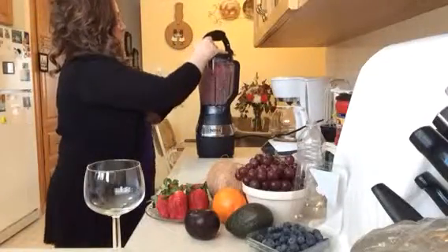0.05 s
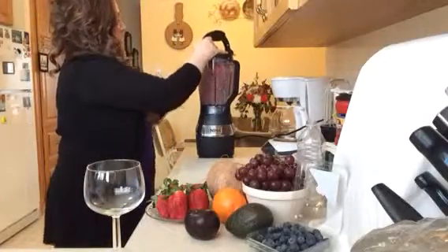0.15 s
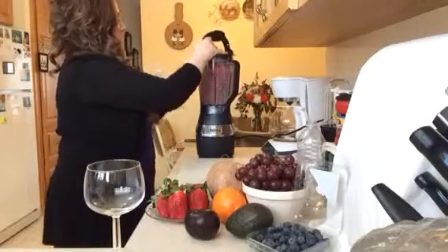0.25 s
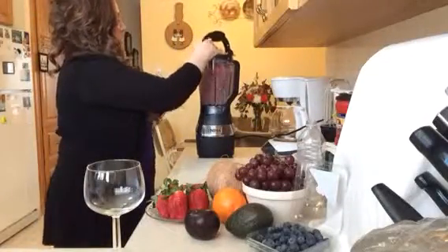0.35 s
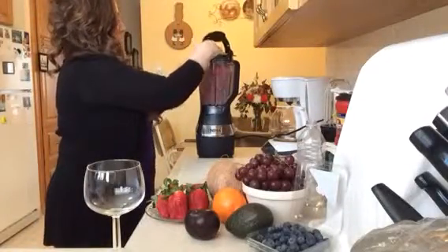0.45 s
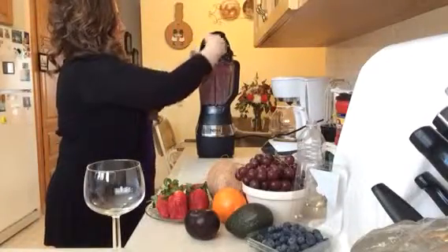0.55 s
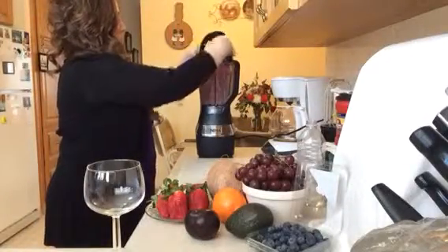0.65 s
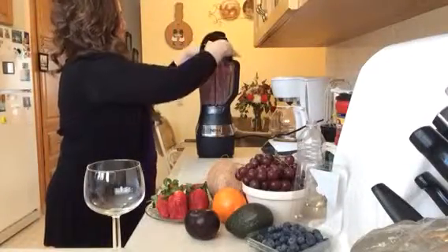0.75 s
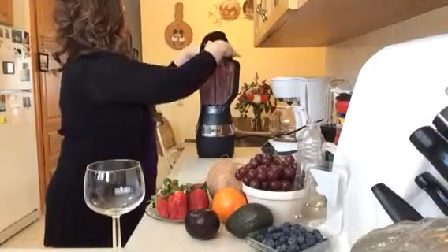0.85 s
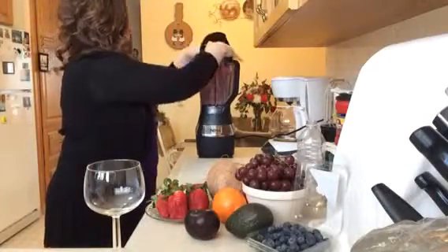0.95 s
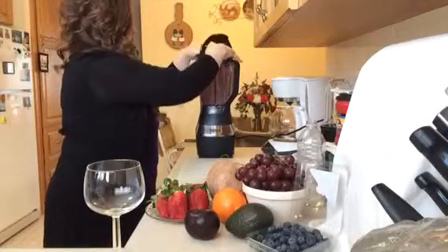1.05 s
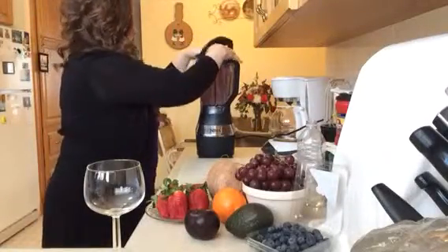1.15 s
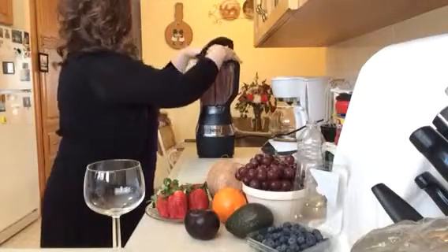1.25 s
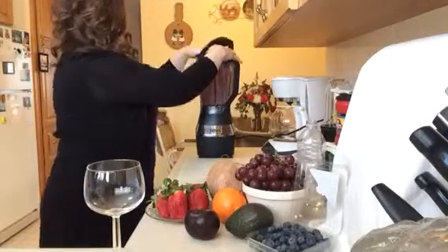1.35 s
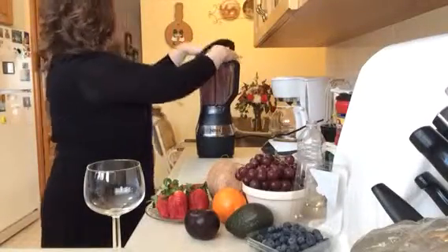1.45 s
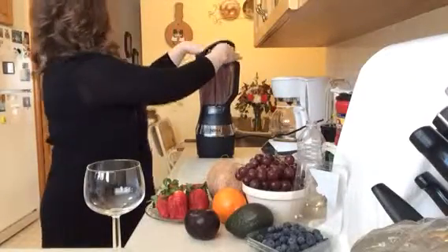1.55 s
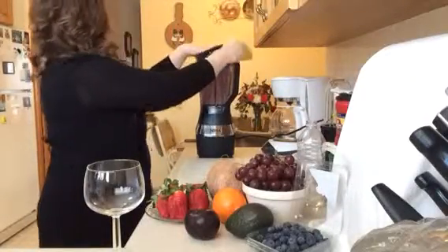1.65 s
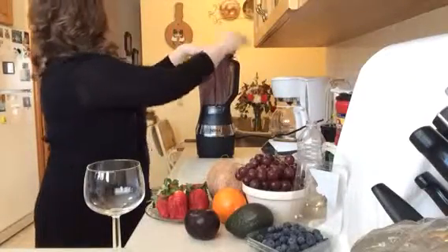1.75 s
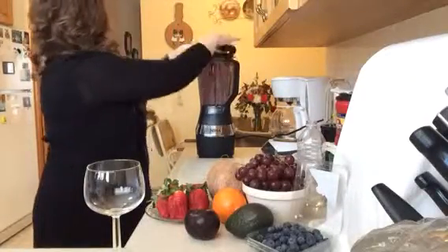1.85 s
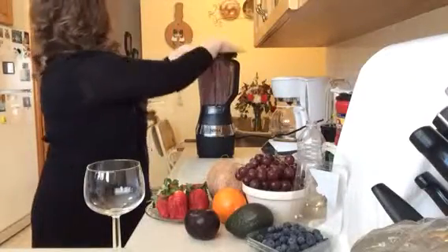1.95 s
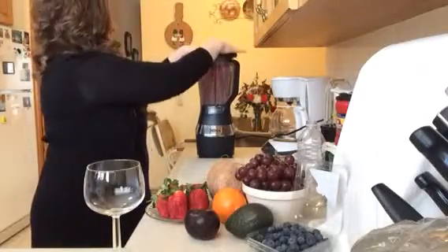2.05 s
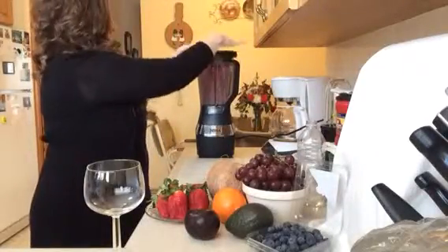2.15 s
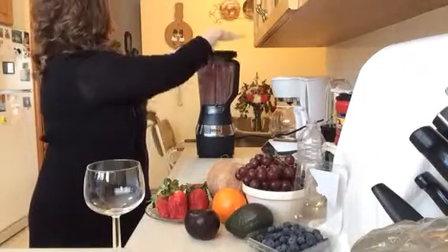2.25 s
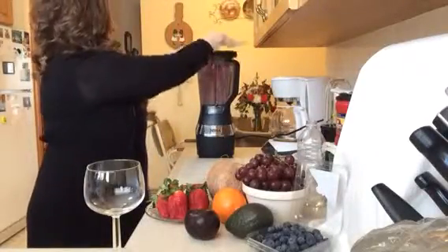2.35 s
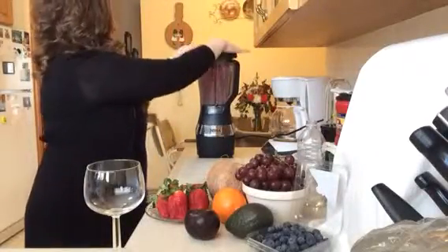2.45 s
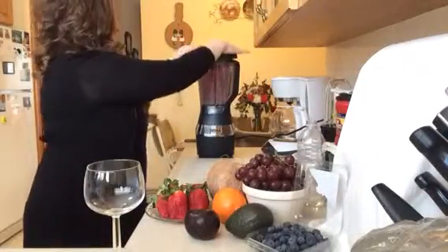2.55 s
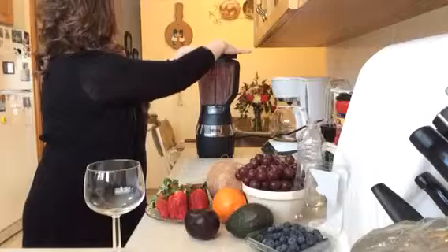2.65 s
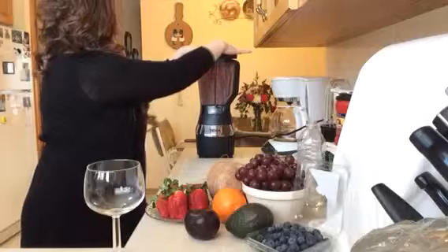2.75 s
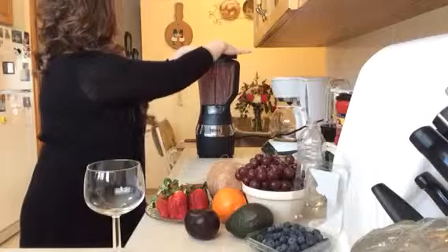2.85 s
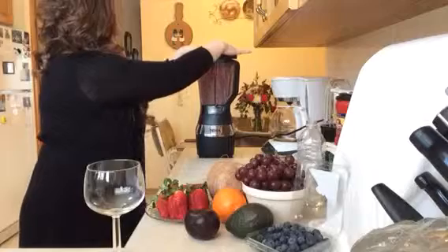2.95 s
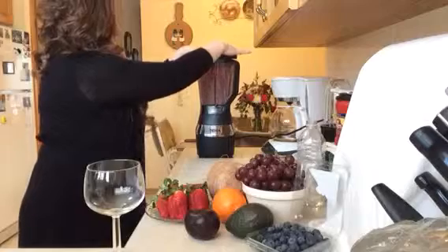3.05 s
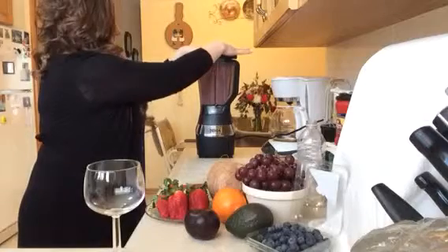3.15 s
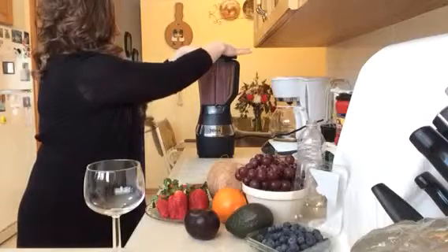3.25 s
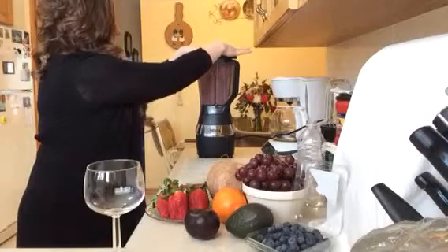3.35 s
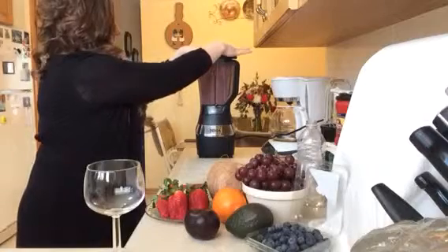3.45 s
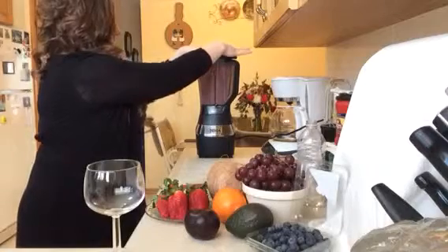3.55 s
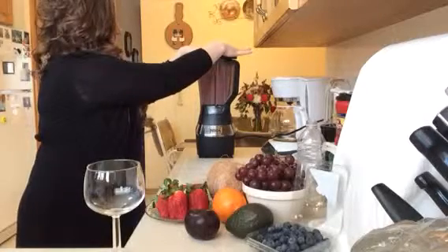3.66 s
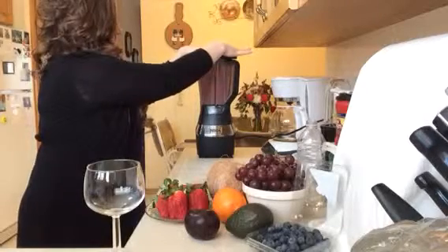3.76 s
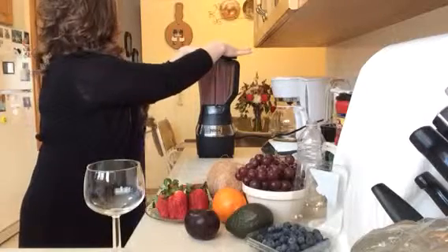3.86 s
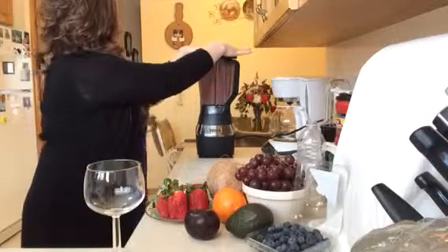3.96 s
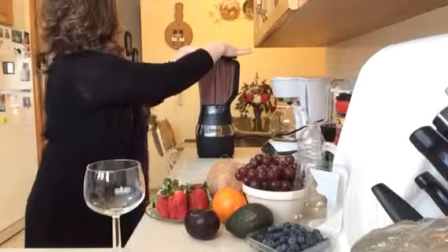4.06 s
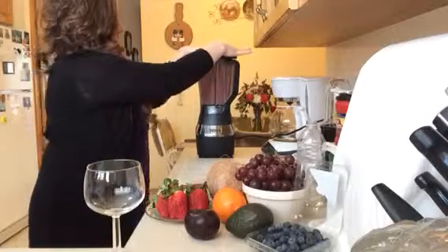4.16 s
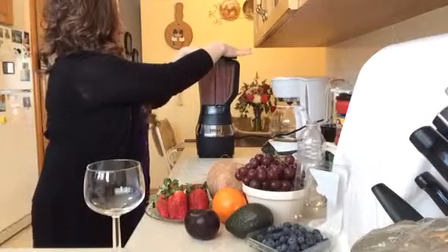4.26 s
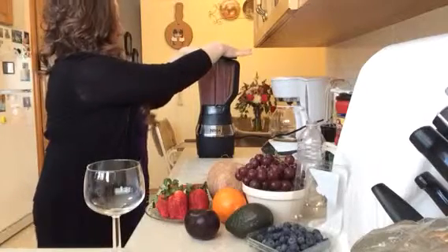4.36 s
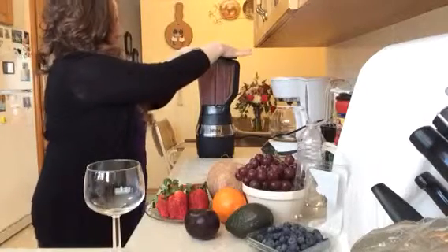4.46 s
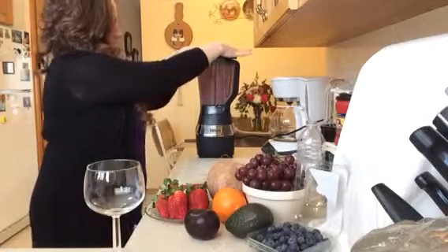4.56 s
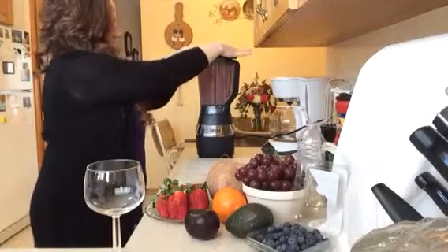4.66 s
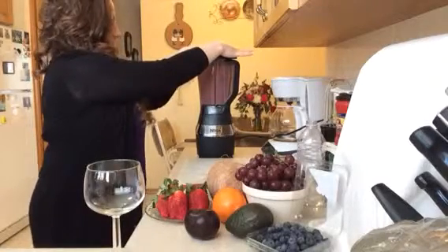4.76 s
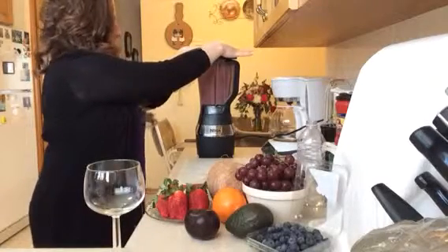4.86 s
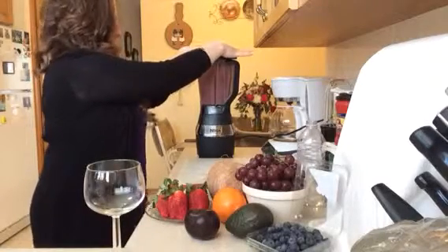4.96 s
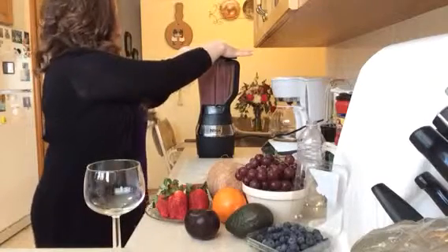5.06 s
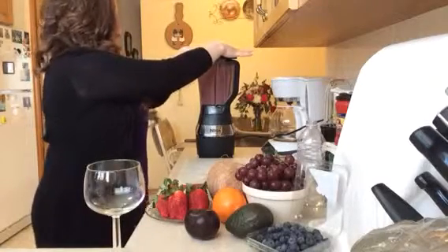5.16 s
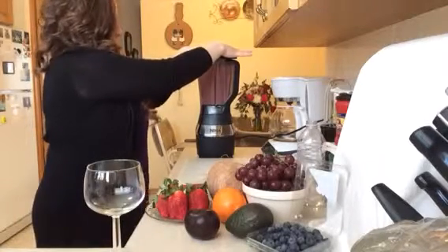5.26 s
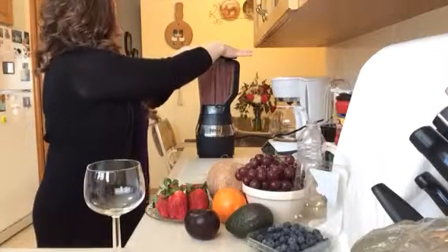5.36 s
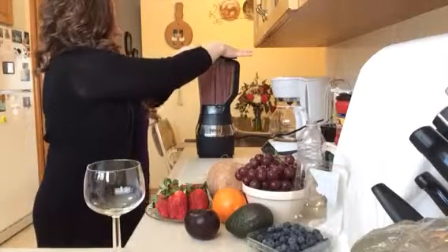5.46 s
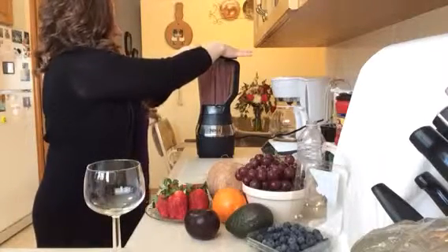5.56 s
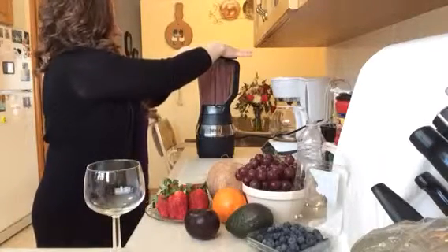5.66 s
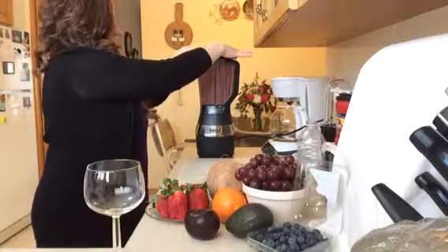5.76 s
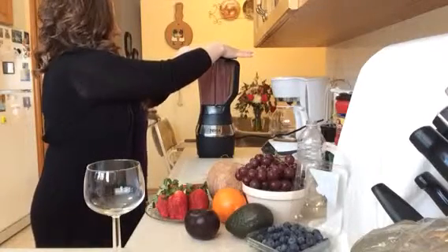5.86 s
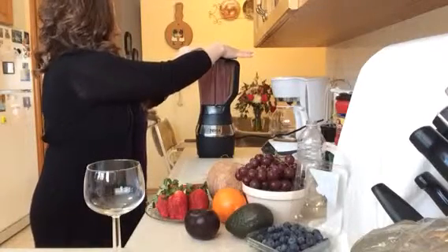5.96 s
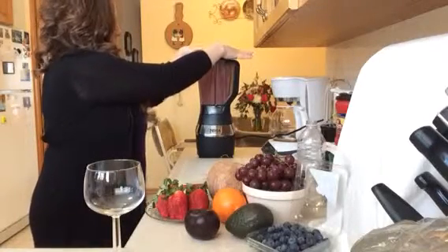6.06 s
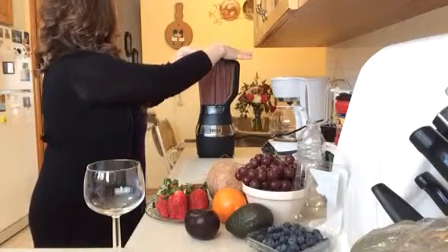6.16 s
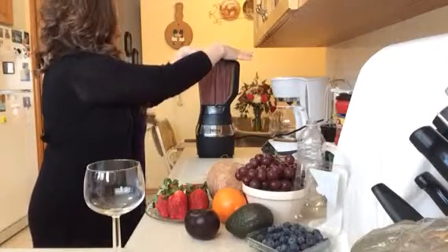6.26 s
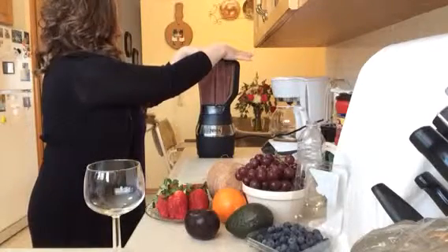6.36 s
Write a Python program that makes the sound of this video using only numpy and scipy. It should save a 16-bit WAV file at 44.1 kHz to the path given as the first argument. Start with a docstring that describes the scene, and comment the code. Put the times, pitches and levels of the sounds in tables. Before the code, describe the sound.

Soft plastic taps come from a lid being worked onto a blender jar, ending in one loud snap. After a button click, the blender spins up and runs to the end, whirring and rattling at a nearly steady pitch while chunks of fruit knock and churn in water. The microphone is across the counter in a small kitchen where a refrigerator hums quietly.

```python
"""A home kitchen, across the counter from a blender full of fruit and water.
The plastic lid squeaks by stick-slip friction and is snapped shut; a button clicks, and the motor
jolts and spins up to a roar. Rattle, whine and hiss follow the shaft's rotation, while chopped fruit
and churning pulp excite the resonances of jar and housing. A refrigerator hums underneath."""
import sys
import numpy as np
from scipy import signal
from scipy.fft import rfft, irfft, next_fast_len
from scipy.io import wavfile

SR = 44100
rng = np.random.default_rng(int(sys.argv[2]) if len(sys.argv) > 2 else 0)


def to_wav(s):
    """Save 16-bit WAV."""
    ch = np.atleast_2d(s).T  # columns
    pcm = np.round(np.clip(ch, -1, 1) * 32767)  # PCM
    wavfile.write(sys.argv[1], SR, pcm.astype(np.int16))


N = 283122
TIME = np.arange(N) / SR

SWITCH_ON_S, FREE_SPEED_HZ = 2.735, 195.1
ROOM_T60_S, RING_T60_S, ECHO_T60_S = 0.27, 0.27, 0.3

# Levels in the tables are relative; each source applies its own gain.
# Spectral envelopes: frequency_hz, level_db
RATTLE_SPECTRUM = [(530, -27), (900, -1.5), (1320, -2.5), (1530, -4), (1680, 3), (2050, 0), (3390, -5),
                   (4400, -9.5), (5000, -11), (6000, -16), (7800, -89), (13200, -120)]  # drive coupling
CHURN_SPECTRUM = [(15, -21), (25, -29), (80, -12), (119, -6), (156, -3), (182, -3.5), (245, -4.5),
                  (381, -11), (528, -6.5), (682, -16), (838, -10.5), (961, -26), (1500, -22), (1950, -29),
                  (3300, -120)]  # moving pulp
AIR_SPECTRUM = [(2650, -13.5), (4500, 0.5), (5010, -9), (6450, -1.5), (7230, -8), (11000, -11),
                (12900, -19), (14300, -15), (15400, -28)]  # fan and brushes
THUD_SPECTRUM = [(60, -20), (130, -3), (190, -5), (260, -1), (370, -6), (520, -4), (850, -8), (1500, -24),
                 (4000, -50)]  # low part of a snap
CLACK_SPECTRUM = [(300, -30), (900, -8), (1800, -7), (2500, -2), (4800, -3), (8500, -9), (11000, -24),
                  (15000, -36)]  # middle of a snap
TICK_SPECTRUM = [(3000, -20), (6500, -5), (10000, 0), (12500, -2), (15000, -9)]  # bright edge of a hard contact
ECHO_SPECTRUM = [(250, -23), (600, 2.5), (1000, 3), (1900, 1.5), (3200, 1.5), (5000, -6.5), (8500, -17),
                 (11000, -28), (15000, -39)]  # a snap as the kitchen reflects it
FLAT_SPECTRUM = [(100, 0), (15000, 0)]
ROOM_SPECTRUM = [(15, -45.5), (25, -13), (69, -16.5), (109, -6.5), (354, -15), (394, -19.5), (438, -15),
                 (1120, -39.5), (1310, -30.5), (1760, -37), (3730, -39), (8780, -45.5), (15000, -52)]
# Resonances of the motor housing, filled jar and plastic parts: centre_hz, width_hz, gain_db
HOUSING_MODES = [(1221, 35, 5), (1383, 25, 4), (1648, 45, 8.5), (1750, 25, 5), (2021, 35, 7.5),
                 (2345, 50, 5), (2850, 70, 4), (3170, 50, 3), (3620, 70, 8), (4375, 50, 7)]
JAR_MODES = [(124.4, 7.6, 9), (237.2, 5.7, 10), (518, 26, 0), (626, 51, 7.5), (862, 12, 5.5),
             (1039, 39, 15.5)]
PLASTIC_MODES = [(248, 45, 7), (580, 120, 2), (1400, 150, 2), (2740, 220, 9), (3400, 330, 10),
                 (8400, 800, 4)]
# Commutator and fan tones: shaft_multiple, level_db
WHINE_HARMONICS = [(2, -5), (3, -6.5), (11, -10.5), (12, -5), (13, -16.5), (15, -6), (23, -22), (24, -7),
                   (36, -19)]
# Impacts of large fruit pieces and of pips on the jar: start_s, level_db
CHUNK_HITS = [(2.736, -21), (2.744, -19.5), (3.101, -37), (3.163, -19.5), (3.279, -16.5), (3.48, -31),
              (3.719, -16), (4.211, -25.5), (4.84, -39)]
PIP_HITS = [(3.1614, -34), (5.1294, -33)]
# Blows on the lid: start_s, level_db, thud_level_db, ring_hz, lowpass_hz, contact_s
LID_KNOCKS = [(0.046, -52, -57, 1400, 7000, 0.011), (0.151, -62, -56, 1220, 3000, 0.009),
              (0.373, -66, -54, 1470, 2500, 0.011), (0.482, -55, -65, 2190, 5000, 0.014),
              (0.84, -51, -63, 2430, 14000, 0.018), (1.01, -43, -46.5, 1970, 5000, 0.018),
              (1.123, -48, -62, 3950, 8000, 0.027), (1.15, -48, -59, 3810, 8000, 0.0072),
              (1.269, -36.5, -45.5, 3850, 5500, 0.018), (1.293, -38, -62, 3600, 6000, 0.034),
              (1.556, -53, -68, 3050, 15000, 0.0097), (1.614, -48.5, -59, 3750, 12000, 0.027),
              (1.686, -34, -50, 4050, 10000, 0.047), (1.771, -25, -38, 3770, 9900, 0.011),
              (2.095, -5.5, -31, 2780, 14000, 0.0073), (2.104, -8.5, -37, 3330, 15000, 0.0087),
              (2.208, -53, -39, 3080, 7000, 0.0096), (2.226, -32, -65, 3030, 5000, 0.012)]
# Slips of the lid seal on the jar: start_s, length_s, start_pitch_hz, level_db
SEAL_SLIPS = [(0.237, 0.075, 3830, -70), (0.385, 0.051, 3750, -63)]


def blender(drag_hz=24.7, spin_up_s=0.102, thinning_s=1.94, chopping_s=1, torque_s=0.35, wobble=0.002953):
    """Rotating machine under load: the shaft spins up, then gains speed as the pulp thins and drags less."""
    age = np.maximum(TIME - SWITCH_ON_S, 1 / SR)
    thickness = np.exp(-age / thinning_s)
    pieces = np.exp(-(age / chopping_s) ** 4)
    torque = np.exp(-age / torque_s)
    speed = (FREE_SPEED_HZ - drag_hz * thickness) * (1 - np.exp(-age / spin_up_s))
    angle = 2 * np.pi * np.cumsum(speed * (1 + wobble * drift(12))) / SR
    running = np.clip((TIME - SWITCH_ON_S) / 0.003, 0, 1)
    lull = swell(middle_s=3.86, half_length_s=0.34)  # the treble sinks for a moment
    # Each gain in dB: its value at free speed, a power law of speed, and a term for the load.
    speed_db = 20 * np.log10(speed / FREE_SPEED_HZ)
    hum = unbalance(angle, speed)
    roar = coupling_rattle(angle, -34.5 + 0.84 * speed_db + 2 * pieces)
    roar += fan_hiss(angle, -40 + 1.1 * speed_db + 0.66 * pieces)
    fruit = blade_growl(angle, -42.5 + 0.4 * speed_db + 1.3 * pieces)
    fruit += pulp_churn(-30.5 + 0.57 * speed_db + 2.6 * pieces)
    tones = motor_whine(angle, -44 + 2.26 * speed_db + 16 * torque - 5 * lull)
    tones += bearing_whistle(angle, -54 + 1.1 * speed_db + 5.3 * (thickness + torque))
    direct = running * (from_db(-lull) * roar + fruit + hum)
    return direct + reverberate(running * tones, wet_db=1.5) + fruit_knocks() + starting_jolt()


def pulp_churn(gain_db, slosh_db=0.46):
    """Random forcing: eddies and soft pieces excite the modes of the filled jar."""
    force = rng.standard_normal(N) + 0.52 * grains(per_s=500, spread_db=3.4)
    force *= from_db(slosh_db * drift(14))
    return from_db(gain_db) * unit_rms(resonate(force, CHURN_SPECTRUM, JAR_MODES))


def coupling_rattle(angle, gain_db, buzz_db=-8.0, beat=0.19):
    """Cyclic impacts in the coupling: what repeats each turn is a harmonic buzz, the rest is noise."""
    buzz = sum(np.sin(k * angle + rng.uniform(0, 2 * np.pi) + 0.48 * drift(10)) * (1 + .5 * drift(9))
               for k in range(4, 34))
    knocks = rng.standard_normal(N) + .5 * grains(per_s=2500, spread_db=5.6)
    knocks *= 1 + beat * np.cos(2 * angle) + 0.033 * np.cos(angle)
    knocks, buzz = (unit_rms(resonate(x, RATTLE_SPECTRUM, HOUSING_MODES)) for x in (knocks, buzz))
    return from_db(gain_db) * unit_rms(knocks + from_db(buzz_db) * buzz)


def unbalance(angle, speed, resonant_db=-31.5, base_hz=193.4, width_hz=10.8):
    """Forced vibration: the base hums as the unbalanced shaft nears its resonance on the counter."""
    response = from_db(resonant_db) / np.hypot(1, 2 * (speed - base_hz) / width_hz)
    return response * np.sqrt(2) * np.sin(angle) * (1 + 0.026 * drift(3.2))


def fan_hiss(angle, gain_db, beat=0.085):
    """Amplitude modulation: noise from the cooling fan and brushes pulses twice a turn."""
    hiss = rng.standard_normal(N) + .5 * grains(per_s=1500, spread_db=3.2)
    hiss *= 1 + beat * np.cos(2 * angle)
    hiss = resonate(hiss, AIR_SPECTRUM, modes=[(5420, 180, 6.0), (8390, 1260, 4.4)])
    return from_db(gain_db) * unit_rms(hiss)


def blade_growl(angle, gain_db, blur_rad=2.36):
    """Phase modulation: blades tearing fruit smear shaft harmonics into a rough band."""
    growl = sum(np.sin(k * angle + blur_rad * drift(60)) for k in range(11, 15))
    return from_db(gain_db) * unit_rms(resonate(growl, FLAT_SPECTRUM, HOUSING_MODES))


def motor_whine(angle, gain_db, ripple_hz=120, flutter=0.46):
    """Commutator and fan tones gain sidebands from torque ripple at twice the mains frequency."""
    ripple = 1 + np.cos(2 * np.pi * ripple_hz * TIME)
    tones = sum(from_db(db) * (1 + flutter * drift(40)) * np.sin(k * angle + drift(35))
                for k, db in WHINE_HARMONICS)
    return from_db(gain_db) * resonate(ripple * tones, FLAT_SPECTRUM, HOUSING_MODES)


def bearing_whistle(angle, gain_db):
    """A rough bearing tone climbs into a resonance; higher harmonics join when it is loudest."""
    tones = sum(np.sin(k * angle + 1.1 * drift(80)) for k in range(35, 39))
    whistle = unit_rms(resonate(tones, FLAT_SPECTRUM, modes=[(6450, 330, 10)]))
    upper = .5 * np.sin(59 * angle + 1.1 * drift(120)) + .35 * np.sin(48 * angle + 1.3 * drift(120))
    strain = from_db(gain_db - gain_db.max())
    return from_db(gain_db) * (whistle + 1.3 * strain * upper)


def fruit_knocks(gain_db=-4, t60_s=0.14):
    """Soft impacts: large pieces strike the wall and excite mainly the jar's low modes."""
    envelope = sum(from_db(db) * decay(start_s, t60_s) for start_s, db in CHUNK_HITS)
    knock = unit_rms(butterworth(resonate(rng.standard_normal(N), CHURN_SPECTRUM, JAR_MODES), 450, "low"))
    return from_db(gain_db) * butterworth(envelope * knock, [105, 1500], "band")


def starting_jolt(shake_db=-19.0, clack_db=-32.5, pitch_hz=128, hold_s=0.081, uneven=0.11):
    """Starting transient: inrush current shakes the base on the counter and the housing clacks."""
    age = np.maximum(TIME - SWITCH_ON_S, 0)
    phase = 2 * np.pi * pitch_hz * age
    shake = np.sin(phase + uneven * drift(60))
    shake += uneven * (drift(60) * np.sin(2 * phase) + .5 * drift(78) * np.sin(3 * phase))
    shake *= np.clip(age / 0.019, 0, 1) * np.exp(-(age / hold_s) ** 4)
    clack = unit_rms(butterworth(shaped_noise(FLAT_SPECTRUM, HOUSING_MODES), [200, 4000], "band"))
    return from_db(shake_db) * shake + from_db(clack_db) * clack * decay(SWITCH_ON_S, t60_s=0.31)


def pip_ticks(gain_db=-8, t60_s=0.033):
    """Hard impacts: seeds touch the wall so briefly that the sound is mostly treble."""
    envelope = sum(from_db(db) * decay(start_s, t60_s) for start_s, db in PIP_HITS)
    return from_db(gain_db) * envelope * shaped_noise(TICK_SPECTRUM)


def lid_knocks(thud_db=3, clack_db=-6, tick_db=-16, ring_db=-5, echo_db=-25, tick_growth=1.1):
    """Impact excitation: the lid rings at a pitch set by the spot struck; harder blows are brighter."""
    thud, clack, tick = plastic_noises()
    room = shaped_noise(ECHO_SPECTRUM)
    out, age = np.zeros(N), TIME[:SR // 2]
    for start_s, level_db, thud_level_db, ring_hz, lowpass_hz, contact_s in LID_KNOCKS:
        span = slice(int(start_s * SR), int(start_s * SR) + len(age))
        ring = from_db(ring_db) * band_noise(ring_hz - 160, ring_hz + 160, len(age))
        crack = from_db(level_db + clack_db) * (clack[span] + ring)
        crack *= snap_envelope(age, contact_s, tail_db=-17)
        edge = from_db(level_db * tick_growth + tick_db) * tick[span]
        edge *= snap_envelope(age, contact_s, tail_db=-14.5)
        thump = from_db(thud_level_db + thud_db) * thud[span]
        thump *= snap_envelope(age, 2 * contact_s, tail_db=-14, t60_s=0.29)
        # A soft push rocks the whole jar; a hard snap moves only the lid and lacks the bass.
        highpass_hz = np.interp(level_db, [-40, -23.5], [70, 194])
        out[span] += butterworth(thump, highpass_hz, "high", order=4)
        out[span] += butterworth(crack + edge, lowpass_hz, "low", order=1)
        out[span] += from_db(level_db + echo_db) * room[span] * echo_envelope(age, contact_s)
    return out


def button_click(start_s=2.5495, contact_s=0.013, ring_hz=2760,
                 thud_db=-37, clack_db=-25, tick_db=-38, ring_db=-26, echo_db=-39):
    """Damped free vibration: the button snaps in with a hard edge and rings briefly."""
    thud, clack, tick = plastic_noises()
    ring = band_noise(ring_hz - 110, ring_hz + 110)
    age = np.maximum(TIME - start_s, 0)
    crack = from_db(clack_db) * clack + from_db(tick_db) * tick + from_db(ring_db) * ring
    crack *= snap_envelope(age, contact_s, tail_db=-10, rise_s=0.0037)
    thump = from_db(thud_db) * thud * snap_envelope(age, 2 * contact_s, tail_db=-8, t60_s=ECHO_T60_S)
    room = from_db(echo_db) * shaped_noise(ECHO_SPECTRUM) * echo_envelope(age, contact_s)
    return thump + crack + room


def seal_squeak(rub_db=-70, glide_hz_per_s=11000):
    """Stick-slip friction: the seal of the twisted lid hisses and slips in short rising squeaks."""
    out = from_db(rub_db) * swell(middle_s=0.36, half_length_s=0.096) * band_noise(4600, 10500)
    for start_s, length_s, start_pitch_hz, level_db in SEAL_SLIPS:
        age = np.clip(TIME - start_s, 0, length_s)
        pitch_hz = (start_pitch_hz + glide_hz_per_s * age) * (1 + .028 * drift(900))
        phase = 2 * np.pi * np.cumsum(pitch_hz) / SR
        tone = 0.37 * np.sin(phase) + np.sin(2 * phase) + 0.23 * np.sin(3 * phase)
        out += from_db(level_db) * np.sin(np.pi * age / length_s) * tone
    return out


def refrigerator_and_room(hum_db=-55.5, hum_hz=59, room_db=-60):
    """Noise floor: the refrigerator's hum is one spectral line over the room's broadband noise."""
    noise = shaped_noise(ROOM_SPECTRUM)
    noise /= np.std(butterworth(noise, 90, "high"))
    hum = np.sqrt(2) * np.sin(2 * np.pi * hum_hz * TIME) * (1 + .06 * drift(4))
    return from_db(room_db) * noise + from_db(hum_db) * hum


def reverberate(x, wet_db):
    """Diffuse field: dense, exponentially decaying reflections join the direct sound."""
    age = TIME[:SR // 2]
    tail = rng.standard_normal(len(age)) * from_db(-60 * age / ROOM_T60_S)
    return x + from_db(wet_db) * signal.fftconvolve(x, tail / np.linalg.norm(tail))[:N]


def resonate(x, spectrum, modes=()):
    """Minimum-phase filter: resonance peaks stand on a broad spectral envelope."""
    size = 2 * next_fast_len(N // 2 + SR // 2)
    hz = np.arange(size // 2 + 1) * SR / size
    knots_hz, knots_db = np.array(spectrum).T
    level_db = np.interp(np.log(hz + 1e-9), np.log(knots_hz), knots_db)
    level_db += sum(db / (1 + (2 * (hz - centre) / width) ** 2) for centre, width, db in modes)
    cepstrum = irfft(np.log(from_db(level_db)))
    cepstrum[1:size // 2] *= 2  # folding the cepstrum makes the filter causal
    cepstrum[size // 2 + 1:] = 0
    return irfft(rfft(x, size) * np.exp(rfft(cepstrum)))[:N]


def shaped_noise(spectrum, modes=()):
    """Filtered white noise of unit power."""
    return unit_rms(resonate(rng.standard_normal(N), spectrum, modes))


def plastic_noises():
    """Thud, clack and tick, coloured by the modes of the plastic."""
    return [shaped_noise(part, PLASTIC_MODES) for part in (THUD_SPECTRUM, CLACK_SPECTRUM, TICK_SPECTRUM)]


def band_noise(low_hz, high_hz, samples=N):
    """Band-limited noise of unit power."""
    return unit_rms(butterworth(rng.standard_normal(samples), [low_hz, high_hz], "band"))


def grains(per_s, spread_db):
    """Shot noise of unit power: random impacts of uneven size."""
    sizes = from_db(spread_db * np.minimum(rng.exponential(1, N), 4)) * rng.choice([-1, 1], N)
    return unit_rms(sizes * (rng.random(N) < per_s / SR))


def drift(rate_hz):
    """Random fluctuation of unit variance, mostly below rate_hz."""
    knots = rng.standard_normal(N // 20)
    return np.interp(TIME * rate_hz * 2, np.arange(len(knots)), knots) * np.sqrt(3 / 2)


def snap_envelope(age, contact_s, tail_db, t60_s=RING_T60_S, rise_s=0.0075):
    """Incoherent sum: a short contact and its diffuse ring add in power."""
    power = np.exp(-2 * age / contact_s) + from_db(tail_db - 60 * age / t60_s) ** 2
    return np.sqrt(power) * np.clip(age / rise_s, 0, 1)


def echo_envelope(age, contact_s):
    """Build-up and decay of the reverberant field behind a snap."""
    return (1 - np.exp(-age / contact_s)) * from_db(-60 * age / ECHO_T60_S)


def decay(start_s, t60_s):
    """Exponential decay after a jump to 1."""
    return (TIME >= start_s) * from_db(-60 * np.clip((TIME - start_s) / t60_s, 0, 5))


def swell(middle_s, half_length_s):
    """Gaussian envelope with a peak of 1."""
    return np.exp(-((TIME - middle_s) / half_length_s) ** 2)


def butterworth(x, hz, kind, order=2):
    """Filter with a maximally flat passband."""
    return signal.sosfilt(signal.butter(order, np.clip(hz, 10, SR * .45), kind, fs=SR, output="sos"), x)


def from_db(db):
    """Decibels to amplitude ratio."""
    return 10 ** (np.asarray(db) / 20)


def unit_rms(x):
    """Scale to unit power."""
    return x / np.sqrt(np.mean(x ** 2) + 1e-20)


def scene():
    """Superposition: all sources add at one point, the same in both channels."""
    handling = lid_knocks() + reverberate(seal_squeak(), wet_db=-0.5) + button_click()
    mono = handling + blender() + pip_ticks() + refrigerator_and_room()
    return np.array([mono, mono])


def record(dry, cutoff_hz=15400):
    """Band limiting: a steep elliptic low-pass removes the highest treble."""
    return signal.sosfilt(signal.ellip(10, .2, 80, cutoff_hz, fs=SR, output="sos"), dry)


dry = scene()
out = record(dry)
to_wav(out)
```